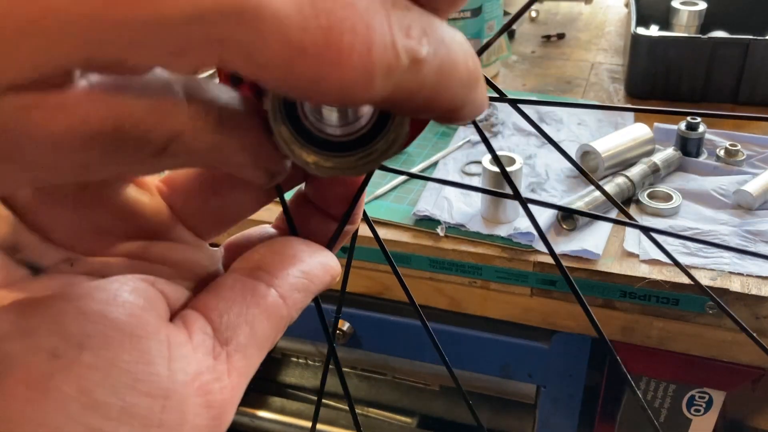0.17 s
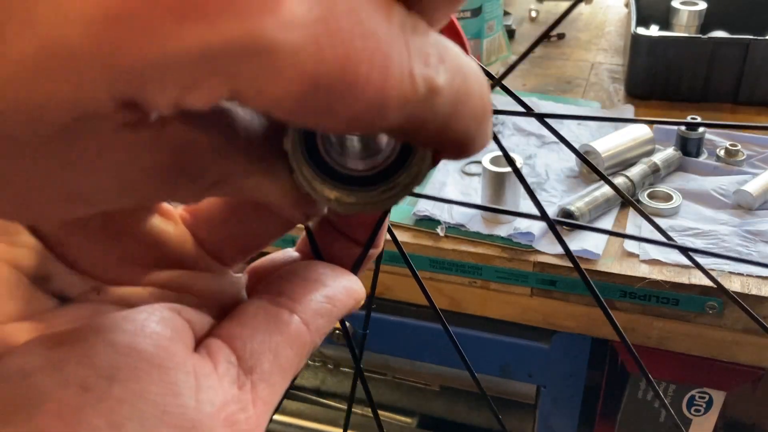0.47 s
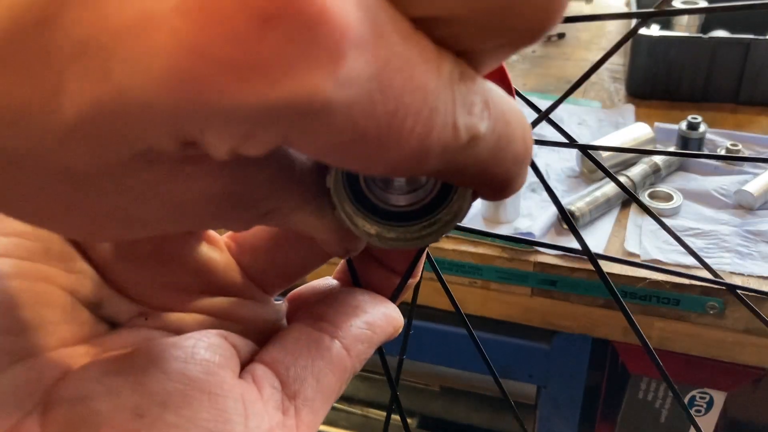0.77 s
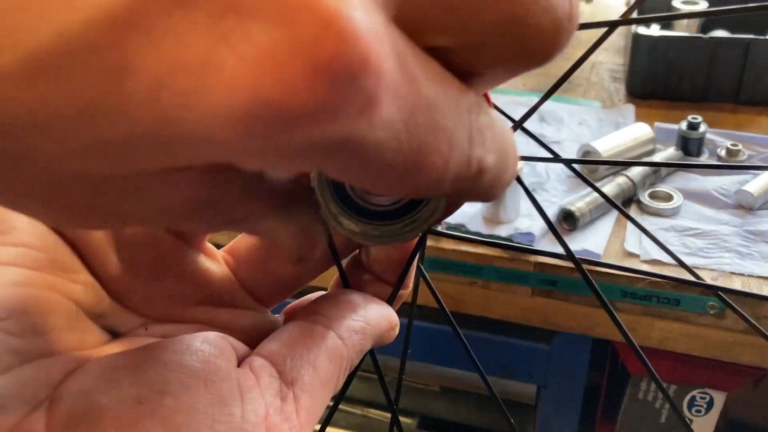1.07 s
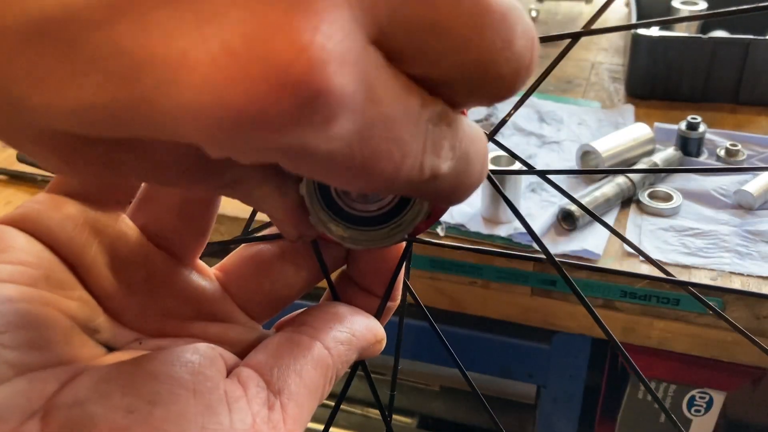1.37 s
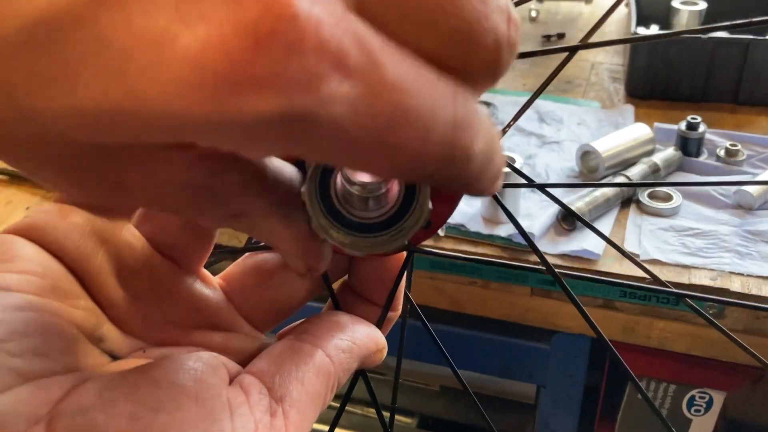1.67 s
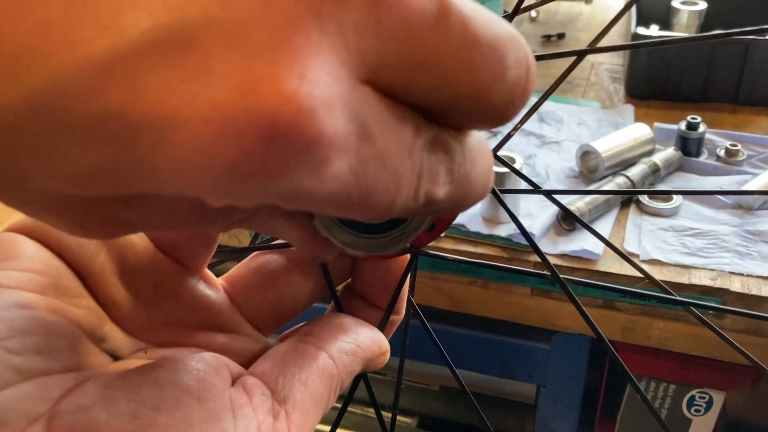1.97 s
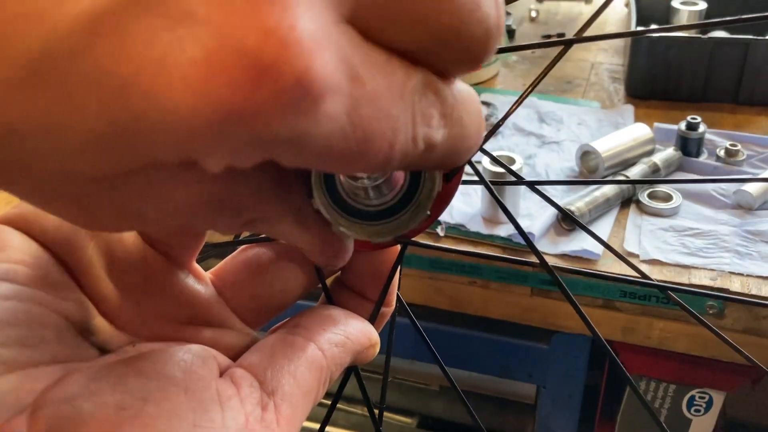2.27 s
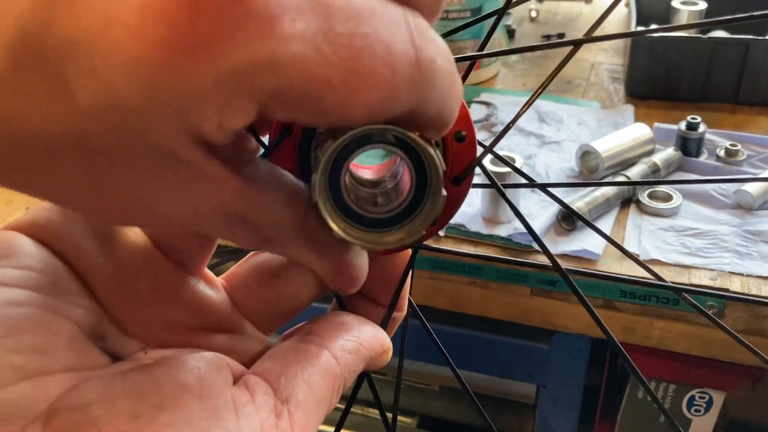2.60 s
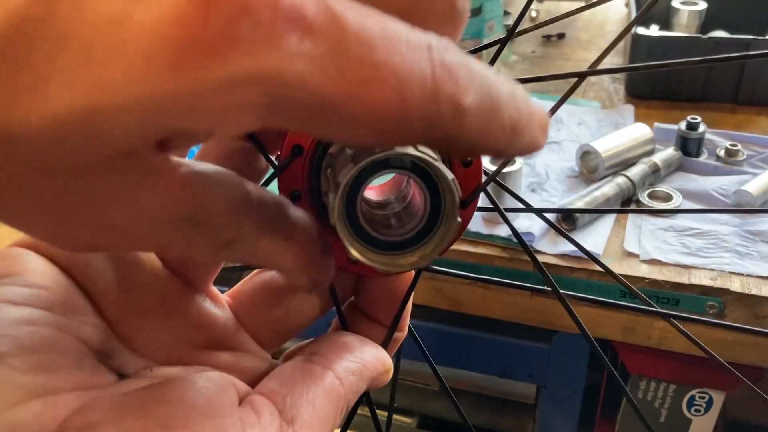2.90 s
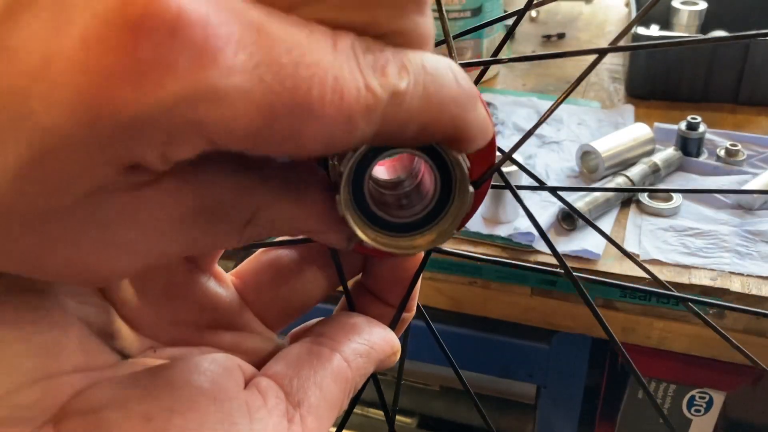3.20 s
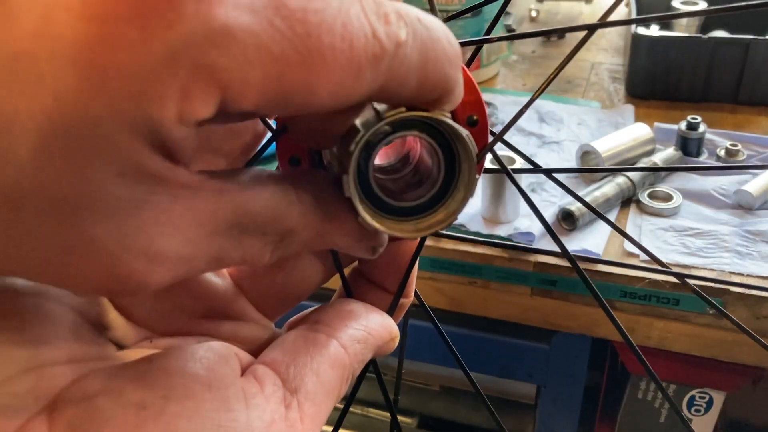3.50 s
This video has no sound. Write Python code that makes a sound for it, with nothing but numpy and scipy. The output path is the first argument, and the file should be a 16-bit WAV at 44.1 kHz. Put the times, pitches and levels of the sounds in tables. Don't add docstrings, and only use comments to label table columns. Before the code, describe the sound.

Steel pawls snap over ratchet teeth in a hand-turned wheel hub, faint and sparse first, then in two dense bright bursts, with low rim thuds and short room reflections over quiet air and distant traffic.

```python
import sys
import numpy as np
from scipy import signal
from scipy.fft import rfft, irfft
from scipy.io import wavfile

SR = 44100
rng = np.random.default_rng(int(sys.argv[2]) if len(sys.argv) > 2 else 0)


def generate_wav(sig):
    pcm = np.round(np.clip(np.atleast_2d(sig).T, -1, 1) * 32767).astype(np.int16)
    wavfile.write(sys.argv[1], SR, pcm)


def how_loud(loudness_db):
    steps = np.asarray(loudness_db, float) / 20
    return 10 ** steps


N = 160965

# start_s, peak_db, jolt_db (wheel jolt re snap), brightness_db_per_octave
PAWL_SNAPS = [(0.632, -27, -6.5, -5.5), (0.7806, -26, -3, -4), (0.8673, -59, 0, -7), (1.93, -24.5, 6, -5),
              (2.151, -36.5, 3, 1), (2.1712, -19, -4, 1), (2.1766, -10.5, -28, -8.5),
              (2.1883, -15.5, -7, -2), (2.1938, -7.5, -12.5, -6.5), (2.2007, -12.5, -11, -2),
              (2.306, -24, -17, -5), (2.3156, -21, -12, 4.5), (2.4297, -13.5, -9, 0),
              (2.4337, -24.5, -8, 6), (2.4751, -20.5, -9, -9), (2.4896, -21.5, -10, 2),
              (2.5171, -12.5, -7.5, 7.5), (2.601, -27.5, -3, -6.5), (3.1689, -14.5, -10.5, -1.5),
              (3.2839, -12, -11, -1.5), (3.3427, -12, -11, 2.5), (3.3743, -20.5, -11.5, 1.5),
              (3.4079, -10.5, -14, 0), (3.4138, -10, -16.5, 12), (3.4626, -14, -11, 8.5),
              (3.471, -20, -9, -1.5), (3.4807, -17, -19, 11), (3.4835, -11.5, -24, -9)]
# pitch_hz, level_db, t60_s
SPOKE_MODES = [(1296, -12, 0.054), (1393, 1, 0.17), (1503, -22.5, 0.13), (1510, -37, 0.098),
               (1609, 13.5, 0.035), (1789, 1, 0.083), (1919, 6.5, 0.11), (1995, -5.5, 0.1),
               (2830, -22.5, .1), (3300, -13, 0.15)]


def at_hz(points, hz):
    table_hz, value = np.transpose(points)
    return np.interp(np.log(np.maximum(hz, 1)), np.log(table_hz), value)


def in_time(rows):
    s, *columns = np.transpose(rows)
    return [np.interp(np.arange(N) / SR, s, c) for c in columns]


def rms_one(x):
    return x / np.sqrt(np.mean(x ** 2) + 1e-20)


def colour(x, spectrum):
    hz = np.fft.rfftfreq(x.shape[-1], 1 / SR)
    return irfft(rfft(x) * how_loud(at_hz(spectrum, hz)), x.shape[-1])


def cut(x, hz, kind, order):
    return signal.sosfilt(signal.butter(order, hz, kind, fs=SR, output="sos"), x)


def slow_noise(hz):
    return rms_one(cut(rng.standard_normal(N), hz, "low", order=2))


def ring(clicks, hz, t60):
    r, w = how_loud(-60 / (t60 * SR)), 2 * np.pi * hz / SR
    return signal.lfilter([0, np.sin(w)], [1, -2 * r * np.cos(w), r * r], clicks + 1e-18)


def train(s, gains):
    return np.bincount(np.clip((np.asarray(s) * SR).astype(int), 0, N - 1), gains, N)


def strike(s, db, modes):
    scatter_db = 3
    luck = rng.standard_normal((len(s), len(modes), 2))
    out = 0
    for k, (hz, mode_db, t60) in enumerate(modes):
        gains = how_loud(db + mode_db + scatter_db * luck[:, k, 0]) * np.sign(luck[:, k, 1])
        out = out + ring(train(s, gains), hz, t60)
    return out


def ports(x, pan_db):
    return x * how_loud(np.array([[pan_db / 2], [-pan_db / 2]]))


def pair(alike, size):
    mid, side = rfft(rng.standard_normal((2, size)))
    alike = np.clip(alike, -1, 1)
    return np.sqrt(1 + alike) * mid + np.sqrt(1 - alike) * side * [[1], [-1]]


def clatter(s, db, tilt_db, apart):
    # pitch_hz, level_db
    mode_colour = [(700, -21.5), (1000, -30), (1500, 0), (2200, 2.5), (3200, -3), (5000, -2.5), (7500, -6),
                   (12000, -14.5)]
    # pitch_hz, t60_s
    mode_t60 = [(800, 0.2), (2000, 0.12), (5000, 0.086), (12000, 0.029)]
    t, out = np.arange(SR // 4) / SR, 0
    for k in range(4):
        hz = np.geomspace(700, 15500, 220) * np.exp(.006 * rng.standard_normal(220))
        mid, side = rng.standard_normal((2, 220))
        spread = mid + apart * (hz < 6500) * side * [[1], [-1]]
        level = how_loud(at_hz(mode_colour, hz) + tilt_db * np.log2(hz / 2000)) * np.sqrt(hz / 2000)
        decay = how_loud(-60 * t / at_hz(mode_t60, hz)[:, None])
        answer = (level * spread) @ (np.sin(2 * np.pi * hz[:, None] * t) * decay)
        blows = train(s[k::4], how_loud(db[k::4]))[None]
        out = out + signal.fftconvolve(blows, answer / abs(answer).max(), axes=1)[:, :N]
    return out


def wide_noise(spectrum):
    # pitch_hz, likeness_0_to_1
    air_alike = [(60, .93), (300, 0.8), (800, 0.07), (6000, 0.1), (8500, 0.94)]
    hz = np.fft.rfftfreq(N, 1 / SR)
    return rms_one(irfft(pair(at_hz(air_alike, hz), N) * how_loud(at_hz(spectrum, hz)) * (hz > 35), N))


def air():
    # pitch_hz, level_db
    air_colour = [(15, -20.5), (25, -5.5), (53, -0.5), (146, -19), (208, -11.5), (252, -16), (634, -27.5),
                  (12000, -43.5), (13500, -53.5), (16500, -58)]
    return how_loud(-68) * wide_noise(air_colour)


def street():
    # time_s, level_db
    traffic_swell = [
        (0.0, -72),
        (0.6, -56),
        (0.94, -75),
        (1.97, -65),
        (2.41, -51),
        (2.69, -93.5),
        (3.03, -48),
        (3.23, -55),
        (3.65, -73),
    ]
    # pitch_hz, level_db
    traffic_colour = [(90, -17), (180, -7.5), (500, -3.5), (1800, -23.5), (3000, -33)]
    level_db = in_time(traffic_swell)[0] - 12.5 + 0.83 * slow_noise(10)
    return how_loud(level_db) * wide_noise(traffic_colour)


def rim_flex():
    # start_s, peak_db
    palm_flexes = [(0.003, -60.5), (0.641, -57), (0.794, -74), (1.935, -45.5), (2.166, -36.5),
                   (2.186, -37.5), (2.247, -43), (2.299, -42), (2.44, -40.5), (2.471, -40.5), (2.526, -40),
                   (2.55, -51), (2.613, -59.5), (3.029, -50), (3.063, -42.5), (3.095, -47), (3.182, -47.5),
                   (3.199, -49), (3.286, -48), (3.341, -37), (3.369, -50.5), (3.434, -53), (3.476, -48.5)]
    # pitch_hz, level_db, t60_s
    rim_modes = [(353.7, -0.5, 0.15), (378.8, -10, 0.17), (171.2, -9.5, 0.051), (473.3, -9.5, 0.14),
                 (516, -8.5, 0.033), (543, -10.5, 0.11), (576, -25, 0.051), (779, -14.5, 0.15),
                 (897, -7.5, 0.097), (1090, -20, 0.05), (1155, -15.5, 0.17)]
    swell_s, level_db = 0.049, 2.5
    s, db = np.transpose(palm_flexes)
    boom = 0
    for mode in rim_modes:
        boom = boom + ring(strike(s, db + level_db, [mode]), mode[0], swell_s)
    return boom * 2 * np.log(1000) / (swell_s * SR)


def grip_creaks():
    # time_s, level_db
    grip_force = [(0, -62.5), (.12, -91), (.3, -73.5), (.47, -76), (.56, -72), (.63, -89), (.66, -61),
                  (1.04, -109), (1.9, -76), (2.08, -61.5), (2.22, -45), (2.39, -43), (2.5, -53), (2.7, -66),
                  (2.98, -70), (3.06, -62), (3.15, -58.5), (3.33, -50), (3.65, -59)]
    jerks_per_s, level_db = 1300, -3.5
    jerks = (rng.random(N) < jerks_per_s / SR) * rng.standard_normal(N)
    jerks = jerks * how_loud(5.0 * slow_noise(4.6))
    rung = sum(how_loud(db) * ring(jerks, hz, 0.26 * t60) for hz, db, t60 in SPOKE_MODES)
    return how_loud(in_time(grip_force)[0] + level_db) * rms_one(rung)


def wheel_body():
    # start_s, peak_db
    hand_knocks = [(0.0034, -91), (1.8122, -60.5), (1.9698, -31), (2.1621, -24), (2.1851, -21),
                   (2.1872, -21), (2.1952, -19), (2.2042, -26), (2.324, -42.5), (2.3783, -39),
                   (3.0151, -47), (3.042, -43), (3.058, -53), (3.062, -49.5), (3.0733, -47.5), (3.087, -38),
                   (3.139, -49), (3.0974, -41), (3.3364, -28)]
    shell_hz = (1564, 2164, 2583)
    jolt_lag_s, shell_t60_s, spokes_db = 0.0019, 0.007, -15.5
    snap_s, snap_db, jolt_db, _ = np.transpose(PAWL_SNAPS)
    knock_s, knock_db = np.transpose(hand_knocks)
    s = np.r_[snap_s + jolt_lag_s, knock_s]
    db = np.r_[snap_db + jolt_db, knock_db]
    thump = sum(ring(train(s, how_loud(db)), hz, shell_t60_s) for hz in shell_hz)
    spokes = np.array([strike(s, db + spokes_db, SPOKE_MODES) for port in "LR"])
    rattle = clatter(s, db + 0.5, tilt_db=-3.5, apart=0.94)
    body = thump + spokes + rattle + grip_creaks()
    return cut(cut(body, 3200, "low", order=4), 1150, "high", order=2)


def ticks():
    # start_s, peak_db, pitch_hz, t60_s
    small_ticks = [(0.248, -67, 3350, 0.021), (0.462, -68, 3700, 0.11), (0.471, -62, 1080, .08),
                   (1.075, -67, 880, .1), (3.017, -43.5, 1423, .15), (3.087, -57.5, 7200, 0.035),
                   (0.479, -67.5, 5140, 0.091), (.543, -64, 4970, 0.028), (.87, -54, 4940, 0.09),
                   (1.06, -69.5, 4980, 0.13), (1.57, -67, 890, 0.054), (1.67, -64.5, 892, 0.093),
                   (1.81, -67, 5040, 0.19), (2.764, -72, 3517, 0.032), (2.987, -27.5, 3480, 0.031),
                   (3.017, -52, 4170, 0.033), (3.043, -38, 3570, 0.0067)]
    out = 0
    for s, db, hz, t60 in small_ticks:
        ratios = np.geomspace(.75, 2, 14)
        cluster = [(hz * k, -26 * abs(np.log2(k)), t60 * .5) for k in ratios]
        out = out + strike([s], np.array([db - 7.0]), cluster)
    return out


def pawls():
    # pitch_hz, level_db
    snap_colour = [(800, -49), (1500, -18), (3000, -16), (5500, -6), (8500, 3), (10800, 6.5), (13500, -3),
                   (16000, -14)]
    snap_t60_s, snap_db, steel_db, size = 0.0062, 3, -7, 1500
    s, db, jolt_db, bright_db = np.transpose(PAWL_SNAPS)
    s = s + .0007
    t, out = np.arange(size) / SR, np.zeros(N + size)
    octaves = np.log2(np.maximum(np.fft.rfftfreq(size, 1 / SR), 3000) / 6000)
    tilt = np.outer(bright_db - 0.55 * (jolt_db + 15), octaves)
    noise = irfft(rfft(rng.standard_normal((len(s), size))) * how_loud(tilt), size)
    attack = np.minimum(t * 4000, 1)
    bursts = colour(noise, snap_colour) * how_loud(-60 * t / snap_t60_s) * attack
    for at, level, burst in zip(s, db, bursts):
        i = int(at * SR)
        out[i:i + size] += how_loud(level + snap_db) * burst / abs(burst).max()
    return out[:N] + clatter(s, db + steel_db - 0.1 * (jolt_db + 15), tilt_db=6.0, apart=0.88)


def machine():
    pitch_hz, width_hz, peak_db = 2085, 34, -85
    swell_db = peak_db - 60 * (np.arange(N) / SR - 1.5) ** 2
    return how_loud(swell_db) * rms_one(ring(rng.standard_normal((2, N)), pitch_hz, 2.2 / width_hz))


def skin_rub():
    # time_s, level_db
    rub_strokes = [
        (0.0, -102),
        (2.01, -98),
        (2.4, -64),
        (2.48, -42),
        (2.65, -110),
        (2.96, -61.5),
        (3.12, -64),
        (3.37, -49.5),
        (3.53, -100.5),
        (3.65, -95),
    ]
    # pitch_hz, level_db
    skin_colour = [(800, -18), (2000, -10.5), (4000, -2), (5500, -6), (8000, -14), (12000, -26),
                   (14000, -44.5)]
    grain_db, level_db = 5, -6.5
    grainy = rng.standard_normal(N) * how_loud(grain_db * slow_noise(80))
    return how_loud(in_time(rub_strokes)[0] + level_db) * rms_one(colour(grainy, skin_colour))


def seal_squeak():
    # time_s, pitch_hz, level_db
    squeak_glide = [
        (2.86, 7450, -95),
        (2.93, 7800, -76),
        (2.98, 8000, -78),
        (2.99, 8000, -110),
    ]
    hz, db = in_time(squeak_glide)
    sounding = np.arange(N) > squeak_glide[0][0] * SR
    jittery_hz = hz + 400 * rng.standard_normal(N)
    return how_loud(db) * sounding * np.sin(2 * np.pi * np.cumsum(jittery_hz) / SR)


def workshop(x):
    # pitch_hz, t60_s
    room_decay = [(250, 0.9), (1700, 0.19), (4600, 0.21), (12000, 0.094)]
    # pitch_hz, likeness_0_to_1
    room_alike = [(300, 0.36), (600, 0.079), (5000, 0.14), (8000, 0.97)]
    size, room_db = SR // 2, -8
    t, hz, tail = np.arange(size) / SR, np.fft.rfftfreq(size, 1 / SR), 0
    noise = pair(at_hz(room_alike, hz), size)
    onset = np.minimum(t / 0.002, 1)
    for centre in 125 * 2. ** np.arange(8):
        band = np.clip(1 - abs(np.log2(hz / centre + 1e-9)), 0, 1)
        tail = tail + irfft(noise * band, size) * how_loud(-60 * t / at_hz(room_decay, centre)) * onset
    tail = tail / np.sqrt(np.sum(tail ** 2) / 2)
    return how_loud(room_db) * signal.fftconvolve(x[None], tail, axes=1)[:, :N]


def scene():
    steel = pawls() + skin_rub() + ticks() + seal_squeak()
    body, rim = wheel_body(), rim_flex()
    near = ports(steel, pan_db=1.8) + ports(body, pan_db=3) + ports(rim, pan_db=3.0)
    room = workshop((steel + how_loud(3.5) * body + how_loud(-5.5) * rim).mean(axis=0))
    return near + room + air() + street() + machine()


def roll_off(x):
    return signal.sosfilt(signal.butter(12, 16970, fs=SR, output="sos"), x)


def record(dry):
    # pitch_hz, lag_rad
    port_turn = [(1300, 0), (2200, 2.4), (3000, 6), (4500, 6.8), (6100, 12), (7200, 12.7), (15800, 25.2),
                 (22050, 34)]
    lag_rad = np.interp(np.fft.rfftfreq(N, 1 / SR), *np.transpose(port_turn))
    left = irfft(rfft(dry[0]) * np.exp(-1j * lag_rad), N)
    x = np.array([left, dry[1]])
    x = signal.sosfilt(signal.cheby2(10, 60, 17000, fs=SR, output="sos"), x)
    return roll_off(x)


dry = scene()
out = record(dry)
generate_wav(out)
```